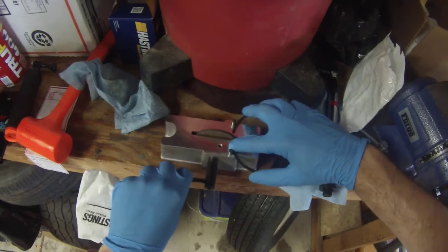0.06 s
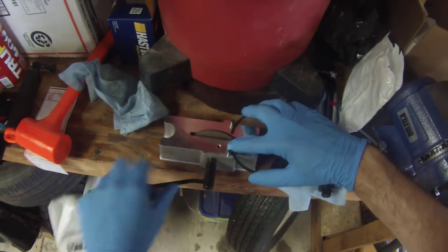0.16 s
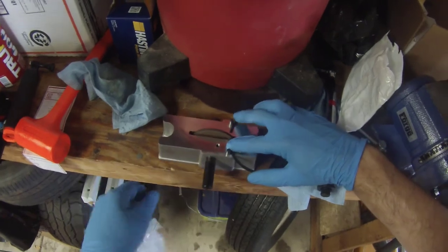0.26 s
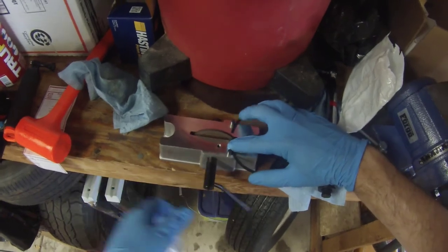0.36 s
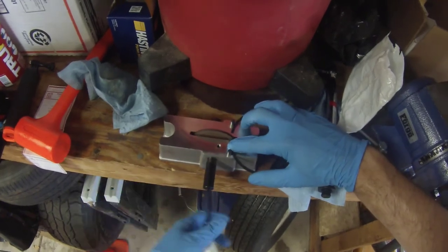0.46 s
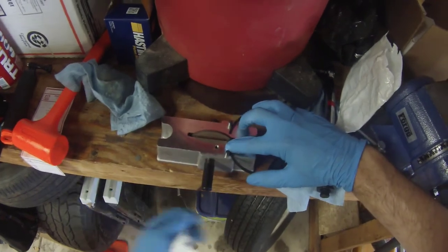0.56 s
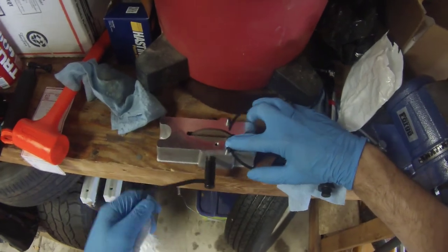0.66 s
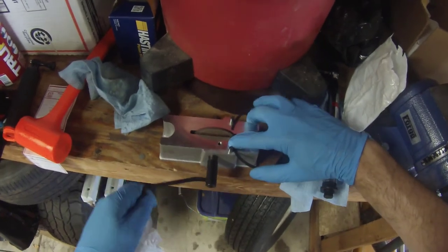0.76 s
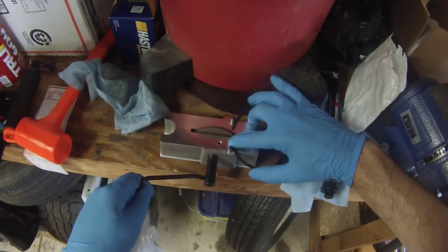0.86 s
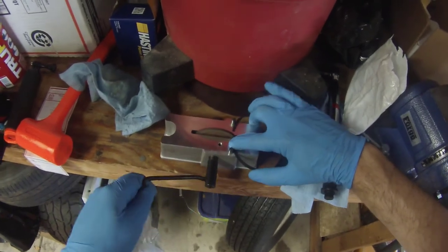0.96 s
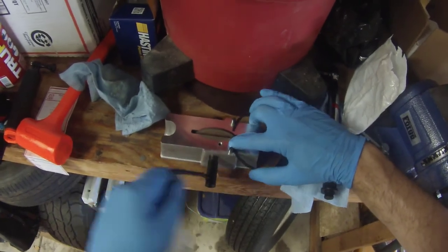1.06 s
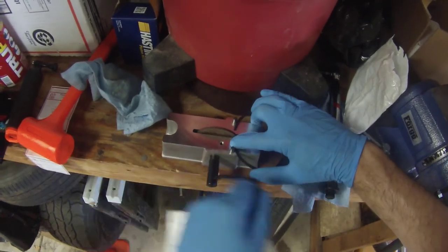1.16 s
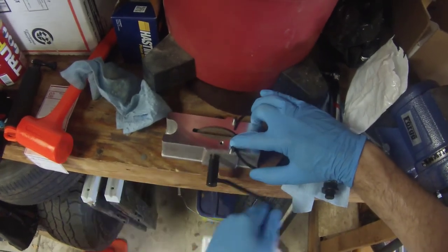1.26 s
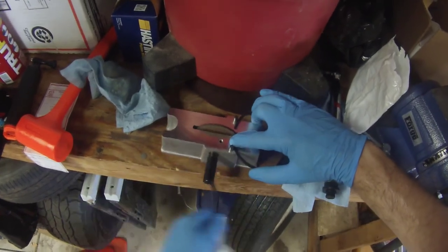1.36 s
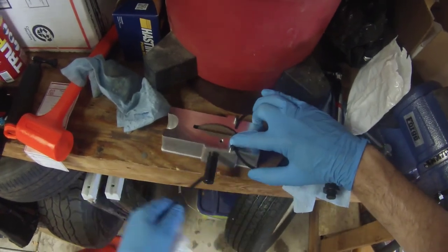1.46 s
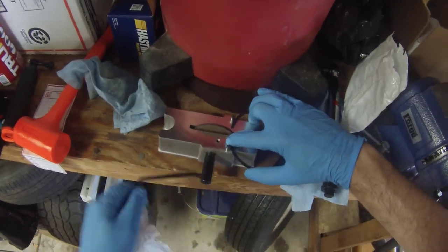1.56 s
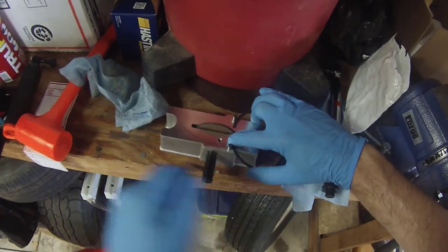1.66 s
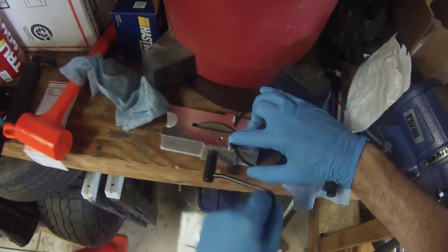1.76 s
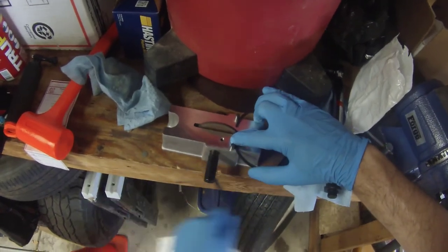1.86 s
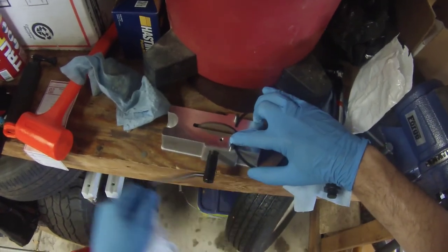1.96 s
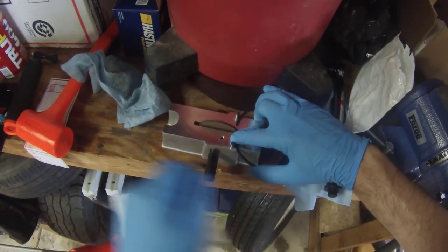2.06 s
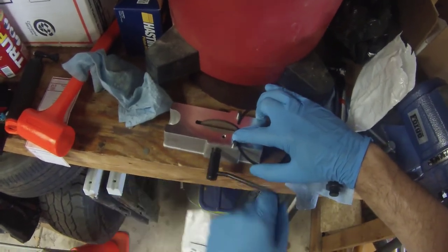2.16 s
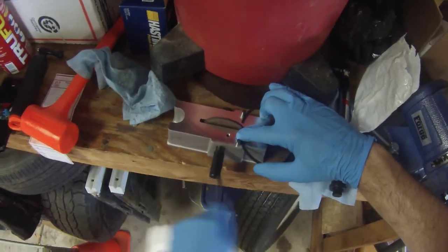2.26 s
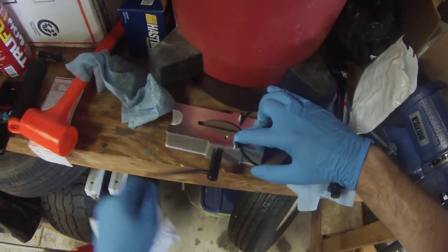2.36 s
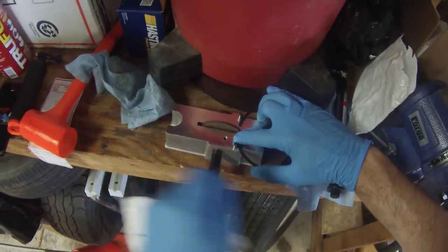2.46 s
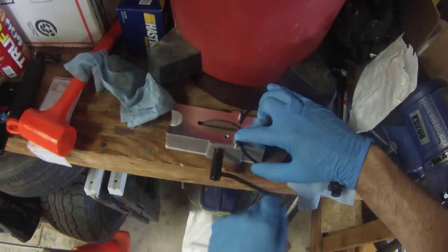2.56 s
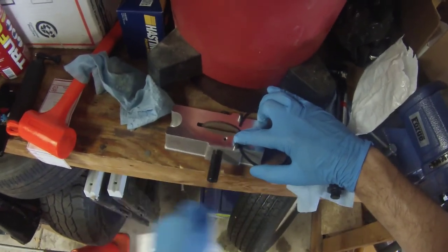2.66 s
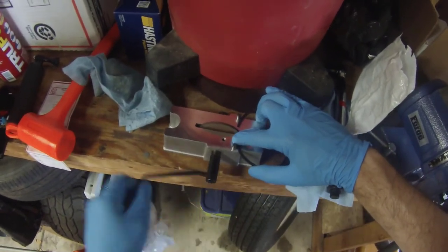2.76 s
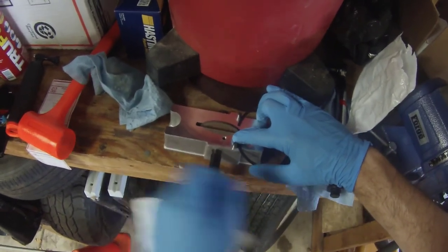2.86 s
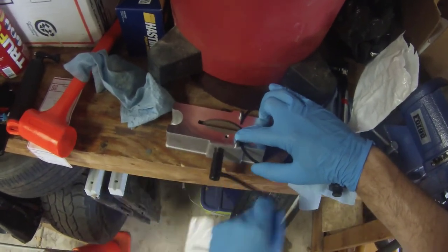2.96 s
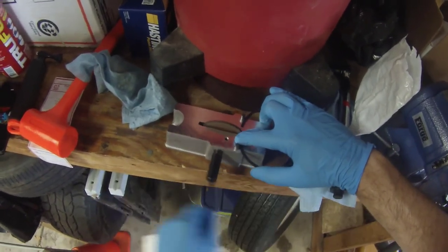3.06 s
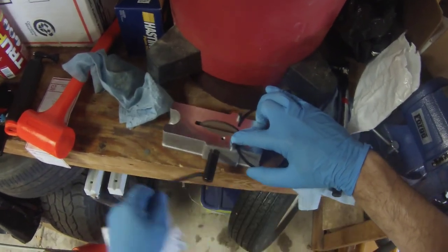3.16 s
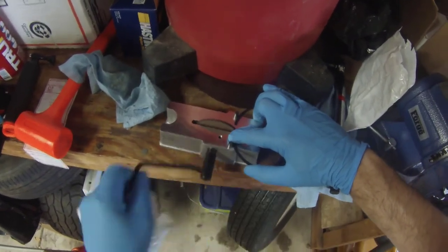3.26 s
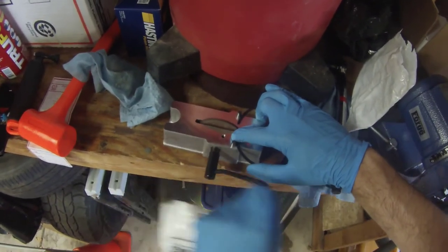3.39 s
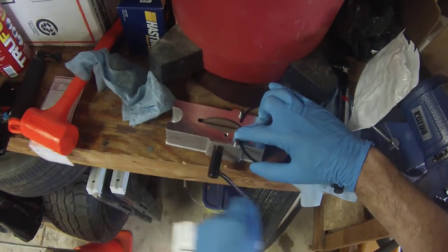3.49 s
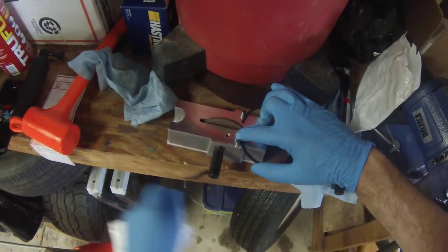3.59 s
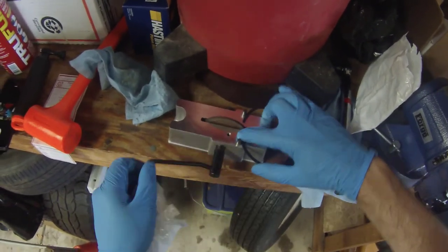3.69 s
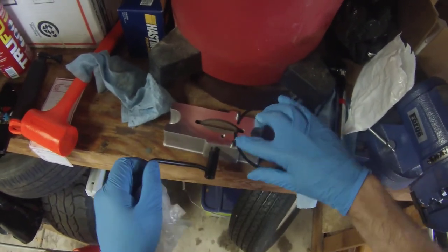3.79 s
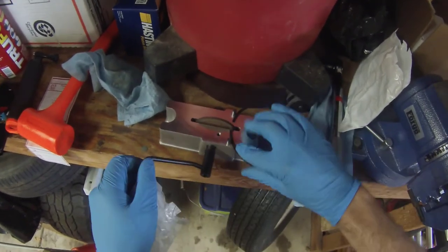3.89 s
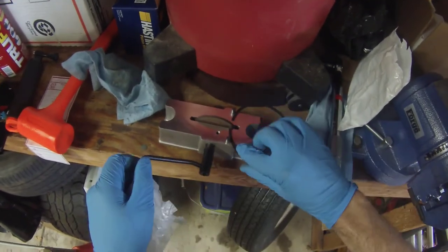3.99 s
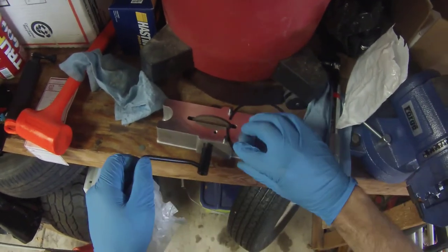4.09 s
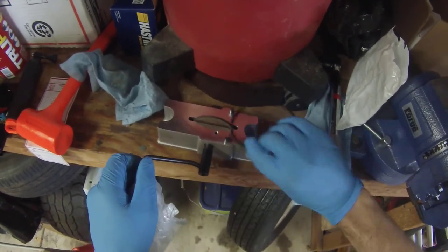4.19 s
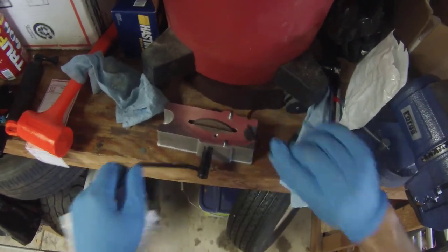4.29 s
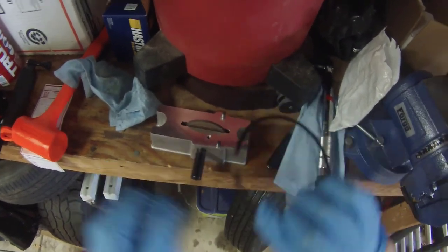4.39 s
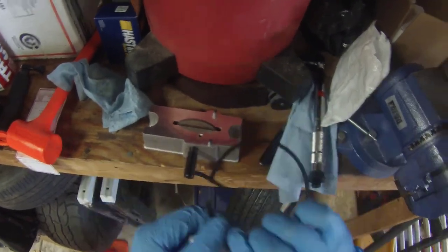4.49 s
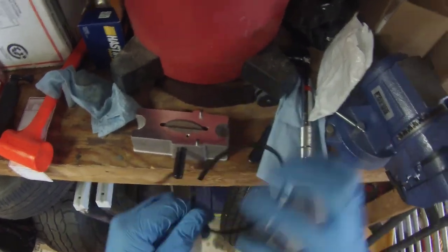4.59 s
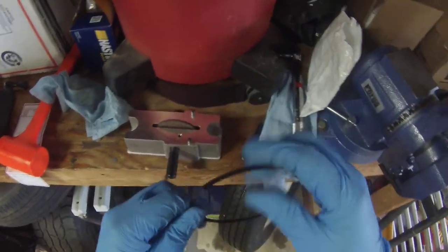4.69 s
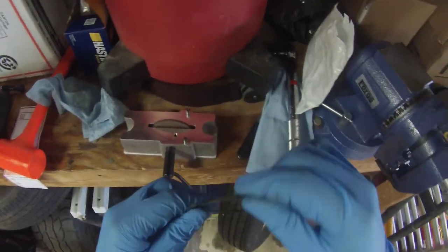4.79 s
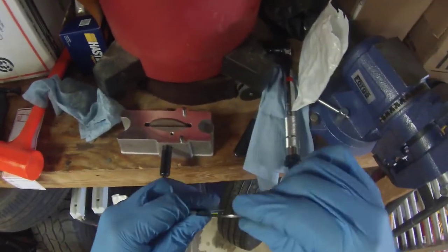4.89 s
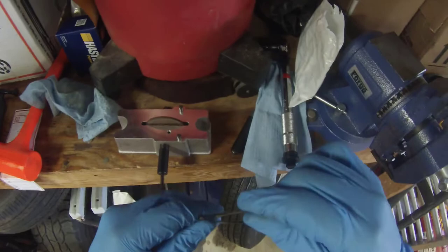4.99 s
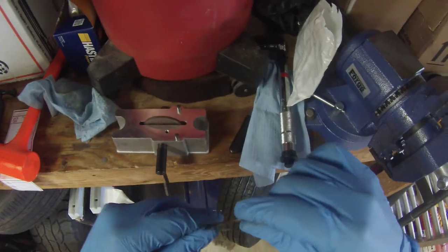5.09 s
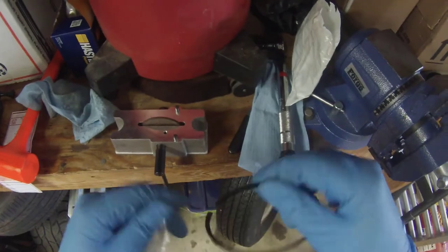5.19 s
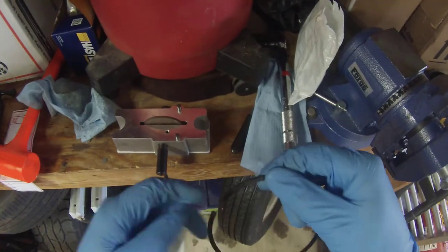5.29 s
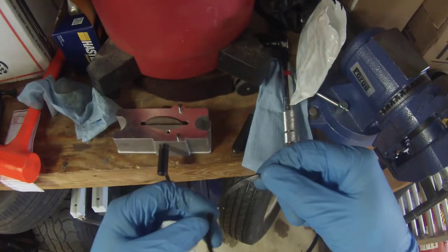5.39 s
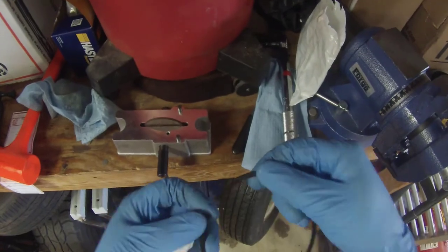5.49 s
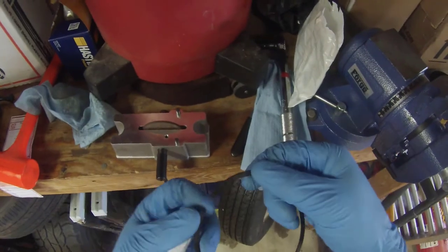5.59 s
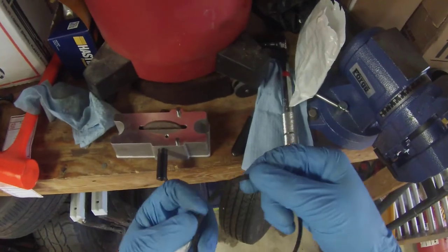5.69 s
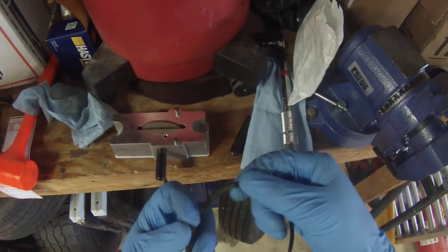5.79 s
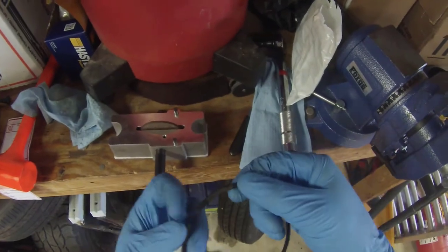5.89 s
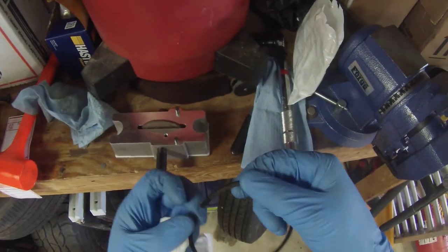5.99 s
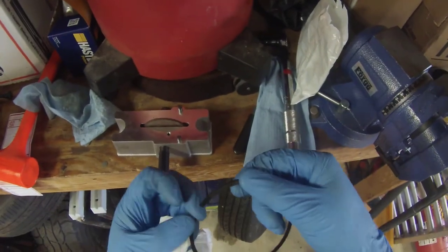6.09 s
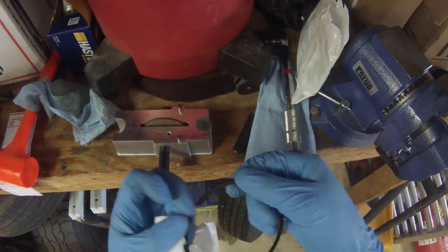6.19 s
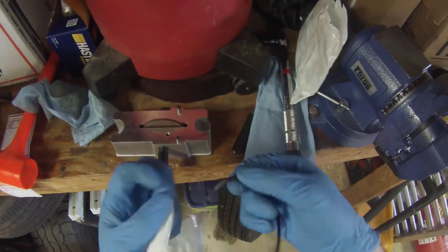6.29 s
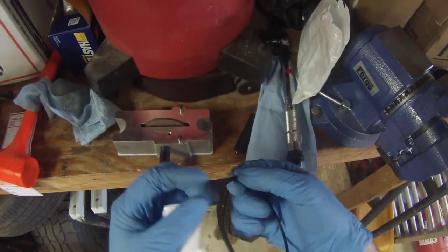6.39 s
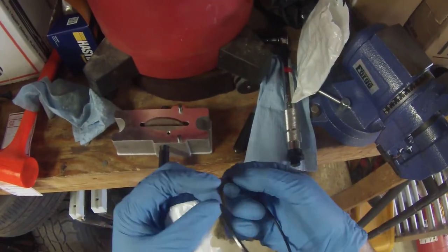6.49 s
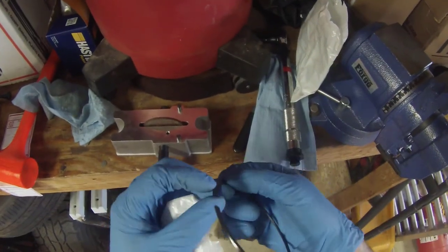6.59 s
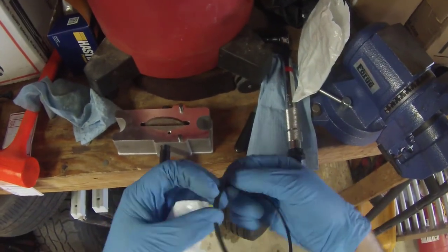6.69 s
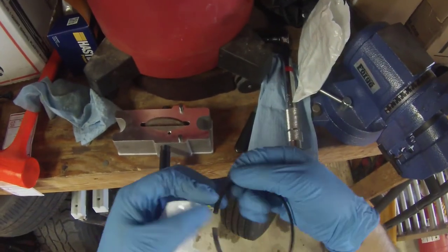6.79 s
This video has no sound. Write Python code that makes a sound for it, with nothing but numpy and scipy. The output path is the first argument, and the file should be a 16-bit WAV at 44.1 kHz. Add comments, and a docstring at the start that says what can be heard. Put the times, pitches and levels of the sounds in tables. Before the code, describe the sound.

Gritty metal filing with rattling crank knocks on a wooden workbench, followed by faint rubbing and small rubber glove snaps.

```python
"""Over a mains hum and steady garage noise, gloved hands nudge a steel piston ring into place.
From 1 s a hand-cranked abrasive wheel files it: friction drives the resonances of the steel and the
wooden workbench, while the loose crank and ring knock and a few tones ring on. Near 3.8 s the filing
stops and the ring is lifted away, rubbing along the bench as the rubber gloves rustle and snap."""
import sys
import numpy as np
from scipy import signal
from scipy.fft import rfft, irfft, next_fast_len
from scipy.io import wavfile
from scipy.ndimage import uniform_filter1d, map_coordinates

SR = 44100
rng = np.random.default_rng(int(sys.argv[2]) if len(sys.argv) > 2 else 0)


def unload_audio(sound):
    """Save the sound as a 16-bit wav file, at the path given as the first command line argument."""
    columns = np.transpose(np.atleast_2d(sound))
    # keep every value between -1 and 1, then stretch to whole-number steps
    steps = np.round(np.clip(columns, -1, 1) * 32767)
    wavfile.write(sys.argv[1], SR, steps.astype(np.int16))


N = 302066

# Modes of bench and tool body, of ring and wheel, and of a glove crease.
# Each row: frequency in Hz, bandwidth in Hz, relative level in dB.
BENCH_MODES = [(60, 77, -24.5), (152.5, 40, -9.5), (208, 18.4, -2.5), (275.4, 56, -4), (365.7, 60.4, 2.5),
               (559.6, 40, -0.5), (739, 79, -3.5), (960, 175, -6), (1070, 50.4, 0), (1308, 287, -7),
               (1688, 73, -5.5), (1925, 670, -11.5)]
STEEL_MODES = [(3450, 200, -12), (4150, 200, -7), (4500, 85, -1), (5220, 250, -11), (6600, 350, -16),
               (8280, 300, -8), (8850, 300, -16), (10500, 1600, -15), (13120, 200, -5.5), (13540, 110, -1),
               (14030, 200, -12), (15100, 500, -20)]
CREASE_MODES = [(7000, 7000, 2)]
# Noise spectra. Each row: frequency in Hz, relative spectral density in dB.
GARAGE_SPECTRUM = [(20, -25), (59, -15.5), (90, -12.5), (119, 0.5), (145, -17), (176, -14), (326, -9.5),
                   (1050, -18.5), (9830, -29), (15800, -32)]
RUBBER_SPECTRUM = [(1060, -29), (1800, -13), (4590, -10), (6600, -12), (15800, -19)]
# Tones left by blows. Each row: start in seconds, frequency in Hz, level in dB, seconds to fall 60 dB.
RINGING_TONES = [(0, 347, -44.5, 1.8), (3.72, 3170, -65, 7), (3.835, 5400, -58, 0.15)]
# Nudges of the ring. Each row: start and length in seconds, bench level and steel level in dB.
NUDGES = [(0, 0.015, -39, -50), (0.144, 0.034, -45, -61), (0.244, 0.18, -47, -69), (0.465, 0.16, -43, -52),
          (0.627, 0.064, -36, -46), (0.792, 0.12, -47.5, -52)]
# Pressure of ring on wheel, heard as bench vibration. Each row: time in seconds, level in dB.
PRESSURE = [(1.0, -49.5), (1.09, -36), (1.36, -36.5), (1.51, -41.5), (1.63, -33), (1.99, -35.5),
            (2.08, -32.5), (2.34, -35.5), (2.61, -31.5), (2.69, -30.5), (2.77, -33.5), (2.85, -27.5),
            (3.04, -34), (3.11, -42), (3.26, -32.5), (3.45, -32), (3.57, -40.5), (3.64, -32), (3.73, -36),
            (3.77, -42), (3.8, -51)]
# Times in seconds at which the crank swings through the fast part of a turn.
TURN_TIMES = [0.85, 1.25, 1.66, 2.05, 2.44, 2.82, 3.3, 3.7, 4.1]
# Glove rustles. Each row: centre and length in seconds, level in dB.
RUSTLES = [(0.214, 0.46, -50.5), (4.204, 0.22, -64), (4.427, 1, -60.5), (5.272, 0.11, -54.5),
           (5.99, 0.14, -56.5), (6.177, 0.13, -49.5), (6.239, 0.042, -51)]
# Snapping creases. Each row: time in seconds, level of the exciting impulse in dB.
SNAPS = [(0.2189, -28), (4.482, -28), (4.667, -26), (4.675, -21), (4.684, -27), (5.633, -35), (6.1953, -27),
         (6.205, -28), (6.3694, -30), (6.449, -30), (6.635, -33)]
# The ring rubbing along the bench. Each row: time in seconds, level in dB.
BENCH_RUB = [(3.8, -58), (4.33, -57.5), (4.39, -46), (4.45, -54), (4.7, -53), (4.85, -58.5), (6.85, -66)]
# Knocks of crank and ring. Each row: start in seconds, steel peak in dB, bench over steel in dB,
# high over low steel modes in dB, favoured pitch in Hz.
KNOCKS = [(0.2624, -32.5, 7.5, -7, 4000), (0.4795, -29, 5.5, 12, 1023), (0.489, -31.5, -2, -3, 1070),
          (0.536, -13.5, -8.5, 15, 965), (0.587, -22, -7.5, 8, 1080), (0.633, -28, -2, -4, 990),
          (0.678, -22.5, -2.5, -1, 560), (0.7337, -25, -2.5, 2, 3460), (1.0772, -13.5, -1, 15, 3360),
          (1.118, -27, 6.5, -17, 1300), (1.158, -22.5, -3, 12, 388), (1.2922, -15, -5, 5, 4530),
          (1.348, -23, 1, 14, 1720), (1.368, -18.5, 0.5, 11, 333), (1.440, -22.5, -5, 4, 4620),
          (1.631, -19, -0.5, 7, 3450), (1.641, -17, -3, 8, 5230), (1.8157, -25.5, 7, -4, 1720),
          (1.9445, -20.5, -2.5, 3, 1230), (2.0273, -18, -14.5, -14, 4000), (2.0648, -23.5, 3.5, -20, 1070),
          (2.2037, -24, 7.5, -5, 345), (2.3034, -20.5, -4, 0, 590), (2.5265, -23.5, 3, -16, 920),
          (2.635, -17, -8, 22, 690), (2.664, -14, -0.5, 15, 514), (2.722, -16, -10, 0, 346),
          (2.8123, -5.5, -19, 5.5, 3450), (3.059, -15.5, -4.5, 15.5, 5000), (3.0702, -28, 7.5, -9, 536),
          (3.127, -18.5, -28, 15, 4500), (3.1961, -12, 3, 8.5, 587), (3.2564, -32, 14, 10, 376),
          (3.309, -26.5, 12.5, 0, 379), (3.482, -34.5, 19, 13, 590), (3.683, -24, 3.5, 17, 1050),
          (3.7, -19, -10, 18, 335), (3.9161, -38.5, 1.5, -3, 1040), (4.099, -36.5, -7, 1, 3200),
          (4.191, -34, -6, 4, 4130), (4.235, -36, -7, 2, 4040), (4.372, -32, 1, 3, 8200),
          (4.397, -33.5, -1, 11, 8200), (4.585, -44.5, 5, 0, 1720), (4.662, -50, 11.5, -2, 2010),
          (5.0119, -43, 1.5, -1, 5200)]
# Likeness of left and right for near and far sound. Each row: frequency in Hz, correlation.
NEAR_COHERENCE = [(60, 0.38), (180, 1), (1650, 0.94), (15000, 0.49)]
FAR_COHERENCE = [(60, 0.53), (950, 0.75), (3770, 0.22), (15000, 0.25)]
# Stereo balance of the tool. Each row: frequency in Hz, left over right in dB.
BALANCE = [(180, -5), (1650, -3.5), (15000, 1)]

HUM_HZ, HUM_DB = 119.6, -53
NUDGE_ATTACK_S, NUDGE_RELEASE_S = 0.0038, 0.042
SCRAPE_DB, SCRAPE_DB_PER_DB, TURN_SWING_DB = -37.5, 0.7, 2  # at full pressure; slope; swing in a turn
SLIDE_HZ, SLIDE_DB, SLIDE_START_TURNS = (1170, 626), 4, -0.38  # a boost slides down the bench modes
KNOCK_WIDTH, KNOCK_DETUNE = .5, .012  # struck steel rings narrower than scraped, and a little off pitch
FAVOUR_DB, FAVOUR_REACH = 13, .065  # a knock lifts the modes near its pitch; reach in log frequency
MIDDLE_DB = 3  # lift of the middle steel modes in a knock
WOOD_TOP_HZ, TOP_HZ = 1800, 16800


def amp(db):
    """Amplitude grows tenfold with every 20 dB."""
    return 10 ** (np.asarray(db) / 20)


def unit(x):
    """Normalisation to an rms of 1."""
    return x / np.sqrt(np.mean(x ** 2) + 1e-20)


def along(points, hz):
    """Interpolation on a logarithmic frequency axis."""
    f, values = np.transpose(points)
    return np.interp(np.log(hz + 1), np.log(f + 1), values)


def envelope_db(rows):
    """A level envelope, linear in dB between the rows and silent outside them."""
    times, levels = np.transpose(rows)
    return np.interp(np.arange(N) / SR, times, levels, left=-120, right=-120)


def wobble(rate):
    """Slow random modulation: a spline through `rate` random values a second."""
    coarse = np.arange(0, N + 32, 32)
    knots = rng.standard_normal(int(N * rate / SR) + 4)
    return np.interp(np.arange(N), coarse, map_coordinates(knots, [coarse * rate / SR]))


def filtered(x, response):
    """Linear filtering: the spectrum is multiplied by a frequency response."""
    n = x.shape[-1]
    m = next_fast_len(n + SR // 4)
    return irfft(rfft(x, m) * response(np.fft.rfftfreq(m, 1 / SR)), m)[..., :n]


def resonator(modes, spread_db=0):
    """Modal superposition: damped resonances of alternating sign add into one response."""
    gains = amp(spread_db * rng.standard_normal(len(modes)))
    return lambda f: sum((-1) ** k * gains[k] * amp(db) * 1j * f * width / (hz * hz - f * f + 1j * f * width)
                         for k, (hz, width, db) in enumerate(modes))


def stereo(direct, other, coherence):
    """Partial coherence: left and right are the sum and difference of two weighted signals."""
    angle = lambda hz: np.arccos(np.clip(along(coherence, hz), -1, 1)) / 2
    weights = lambda hz: np.array([np.cos(angle(hz)), np.sin(angle(hz))])
    mid, side = filtered(np.array([direct, other]), weights)
    return np.array([mid + side, mid - side])


def diffuse_echo(x, t60):
    """A diffuse echo: power lingers, phases scramble, and the bass is filtered out."""
    t, spectra = signal.stft(x, SR, nperseg=256)[1:]
    retained = amp(-120 * t[1] / max(t60, .002))
    power = signal.lfilter([1 - retained], [1, -retained], abs(spectra) ** 2, axis=1)
    noise = signal.stft(rng.standard_normal(N), SR, nperseg=256)[2]
    echo = signal.istft(np.sqrt(power) * noise, SR, nperseg=256)[1][:N]
    return filtered(unit(echo) * np.std(x), lambda hz: hz ** 4 / (hz ** 4 + 220 ** 4))


def garage():
    """Stationary room noise lies under a wavering hum, the second harmonic of the mains."""
    noise = unit(filtered(rng.standard_normal((2, N)), lambda hz: amp(along(GARAGE_SPECTRUM, hz))))
    phase = 2 * np.pi * np.cumsum(HUM_HZ + 2.345 * wobble(9)) / SR
    hum = amp(HUM_DB + wobble(11) + 2.5 * wobble(45)) * np.sin(phase)
    return amp(-54.5) * stereo(*noise, FAR_COHERENCE) + hum


def ringing():
    """Free vibration: lightly damped modes decay exponentially after a blow."""
    t = np.arange(N) / SR
    flicker_db = 2 * wobble(25)
    return sum((t >= start) * amp(db - 60 * abs(t - start) / t60 + flicker_db) * np.sin(2 * np.pi * hz * t)
               for start, hz, db, t60 in RINGING_TONES)


def contact_levels(turn):
    """Friction follows load: bench and steel levels in dB rise with each nudge, then with pressure."""
    t, pressure_db = np.arange(N) / SR, envelope_db(PRESSURE)
    swing_db = TURN_SWING_DB * np.cos(2 * np.pi * turn)
    scrape_db = SCRAPE_DB + SCRAPE_DB_PER_DB * (pressure_db - pressure_db.max()) + swing_db
    gains = amp([pressure_db, scrape_db])
    for start, length, *levels_db in NUDGES:
        attack = np.clip((t - start) / NUDGE_ATTACK_S, 0, 1)
        release = np.exp(-np.maximum(t - start - length, 0) / NUDGE_RELEASE_S)
        gains += amp(levels_db)[:, None] * attack * release
    return 20 * np.log10(gains)


def stick_slip(per_s, relax_s, steady):
    """Stick-slip friction: drag jumps when the ring catches on the wheel, then relaxes."""
    jumps = (rng.random(N) < per_s / SR) * amp(0.97 * rng.standard_normal(N))
    return steady + signal.lfilter([1], [1, -np.exp(-1 / (relax_s * SR))], jumps)


def grit(per_s, spread_db, smooth):
    """Shot noise: grains catch at random moments, over a smooth rub."""
    caught = rng.random(N) < per_s / SR
    grains = caught * amp(spread_db * rng.standard_normal(N)) * rng.choice([-1, 1], N)
    return unit(grains) + smooth * rng.standard_normal(N)


def drifting_modes(x, modes, drift_db, rate, boost_db=lambda hz: 0):
    """Resonance under a changing grip: the strength of each driven mode drifts."""
    driven = filtered(x, lambda f: np.array([resonator([mode])(f) for mode in modes]))
    return sum((-1) ** k * amp(drift_db * wobble(rate) + boost_db(mode[0])) * driven[k]
               for k, mode in enumerate(modes))


def filing():
    """Forced vibration: grit on the wheel drives the steel, and the uneven drag shakes the bench."""
    turn = np.interp(np.arange(N) / SR, TURN_TIMES, np.arange(len(TURN_TIMES)))
    bench_db, steel_db = contact_levels(turn)
    drag = stick_slip(per_s=110, relax_s=.005, steady=1.3)
    bench_force = drag * amp(1.2 * wobble(60)) * grit(per_s=250, spread_db=0, smooth=1)
    steel_force = drag ** .8 * amp(1.3 * wobble(45)) * grit(per_s=1600, spread_db=2.5, smooth=.8)
    hiss = filtered(steel_force, lambda f: f / (f + 2500))
    firmness = np.clip((steel_db + 60) / 12, .1, 1)  # a light touch hisses, firm contact rings
    ring = drifting_modes(steel_force, STEEL_MODES, drift_db=3.2, rate=24)
    steel = firmness * unit(ring) + .45 * unit(hiss)
    slide = (turn - SLIDE_START_TURNS) % 1
    centre_hz = SLIDE_HZ[0] * (SLIDE_HZ[1] / SLIDE_HZ[0]) ** slide
    boost = lambda hz: uniform_filter1d(SLIDE_DB * np.exp(-(np.log(hz / centre_hz) / .15) ** 2), 800)
    bench = drifting_modes(bench_force, BENCH_MODES, drift_db=3.5, rate=30, boost_db=boost)
    bench = filtered(bench, lambda f: 1 / (1 + 1j * f / (1.65 * WOOD_TOP_HZ)) ** 2)
    return amp(bench_db) * unit(bench) + amp(steel_db) * unit(steel)


def gloves():
    """Friction and impulses: rubber rustles, creases snap, and the held ring rubs along the bench."""
    t = np.arange(N) / SR
    rustle = sum(amp(db) * np.cos(np.pi * np.clip((t - centre) / length, -.5, .5)) ** 2
                 for centre, length, db in RUSTLES)
    creases = amp(2.5 * wobble(60)) * grit(per_s=500, spread_db=4.5, smooth=.8)
    crackle = filtered(creases, lambda hz: amp(along(RUBBER_SPECTRUM, hz)))
    impulses = np.zeros(N)
    for start, db in SNAPS:
        impulses[round(start * SR)] = amp(db)
    rub_force = amp(2.7 * wobble(40)) * grit(per_s=220, spread_db=2, smooth=1)
    rub = drifting_modes(rub_force, BENCH_MODES[6:], drift_db=2.5, rate=21)
    handling = rustle * unit(crackle) + amp(envelope_db(BENCH_RUB)) * unit(rub)
    handling = stereo(handling, diffuse_echo(handling, t60=.01), FAR_COHERENCE)
    return handling + filtered(impulses, lambda f: resonator(CREASE_MODES)(f) ** 2)


def favoured(modes, pitch_hz):
    """Selective excitation: a knock lifts the modes nearest its pitch."""
    return [(hz, width, db + FAVOUR_DB * np.exp(-(np.log(hz / pitch_hz) / FAVOUR_REACH) ** 2))
            for hz, width, db in modes]


def knocks():
    """Impact excitation: each short rattling contact rings steel and bench modes at new strengths."""
    out, t = np.zeros(N + SR), np.arange(SR // 16) / SR
    for start, db, bench_db, bright_db, pitch_hz in KNOCKS:
        contact_s = 0.0011 * amp(0.3 * (db + 23))  # a harder knock rattles longer
        rise = t / contact_s / [[1], [1.5]]  # the bench rattles longer than the steel
        steel_force, bench_force = rise * np.exp(-rise) * rng.standard_normal((2, len(t)))
        struck = [(hz * (1 + KNOCK_DETUNE * rng.standard_normal()), width * KNOCK_WIDTH, level)
                  for hz, width, level in favoured(STEEL_MODES, pitch_hz)]
        ring = resonator(struck, spread_db=3)
        thud = resonator(favoured(BENCH_MODES[3:], pitch_hz), spread_db=3)
        tilt_db = [-bright_db / 2, MIDDLE_DB, MIDDLE_DB, bright_db / 2]
        tilt = lambda f: amp(np.interp(f, [5240, 5600, 11300, 12600], tilt_db))
        steel = filtered(steel_force, lambda f: (ring(f) + 0.04 * f / (f + 2500)) * tilt(f))
        wood = filtered(bench_force, lambda f: thud(f) / (1 + 1j * f / max(WOOD_TOP_HZ, pitch_hz)))
        knock = steel / abs(steel).max() + amp(bench_db) * wood / abs(wood).max()
        out[round(start * SR):][:len(t)] += amp(db) * knock
    return out[:N]


def scene():
    """Superposition: the close tool, its faint reverberation, the gloves and the garage add."""
    tool, tones = filing() + knocks(), ringing()
    close = stereo(tool, diffuse_echo(tool, t60=0.011), NEAR_COHERENCE) + tones
    close = filtered(close, lambda hz: amp(np.array([[.5], [-.5]]) * along(BALANCE, hz)))
    room = amp(-14) * np.array([diffuse_echo(tool, t60=.2) for _ in range(2)])
    return close + room + gloves() + garage()


def record(dry):
    """Band limiting: the top treble falls steeply, and nothing passes above TOP_HZ."""
    return filtered(dry, lambda hz: (hz < TOP_HZ) / (1 + (hz / 15650) ** 90))


dry = scene()
out = record(dry)
unload_audio(out)
```